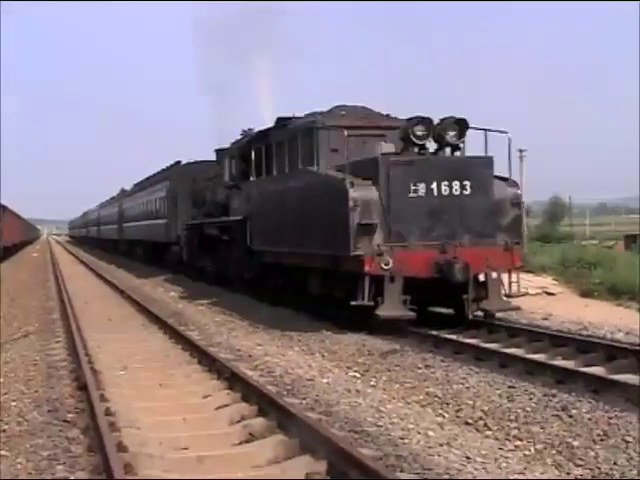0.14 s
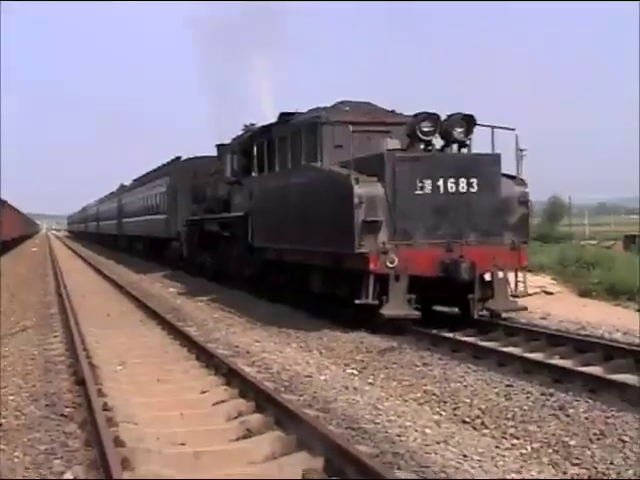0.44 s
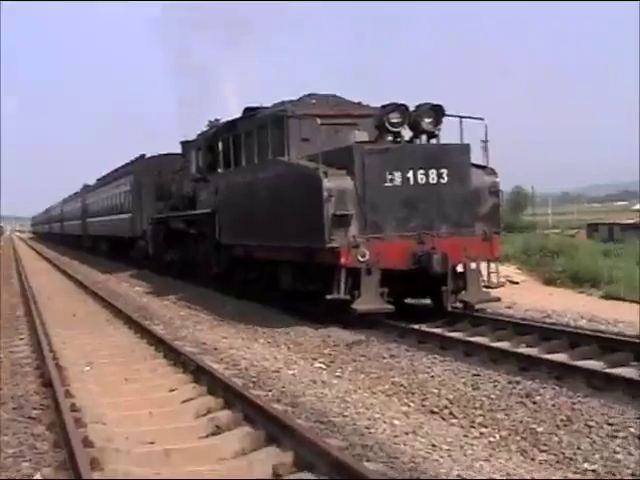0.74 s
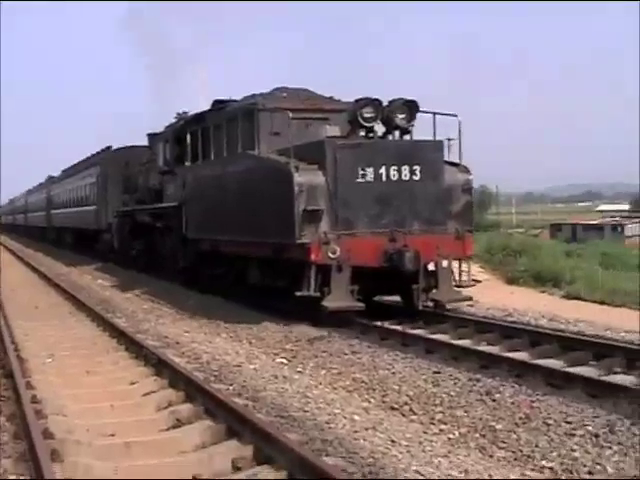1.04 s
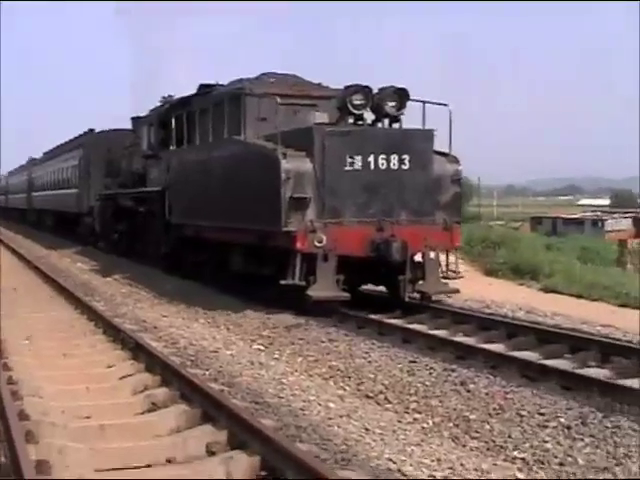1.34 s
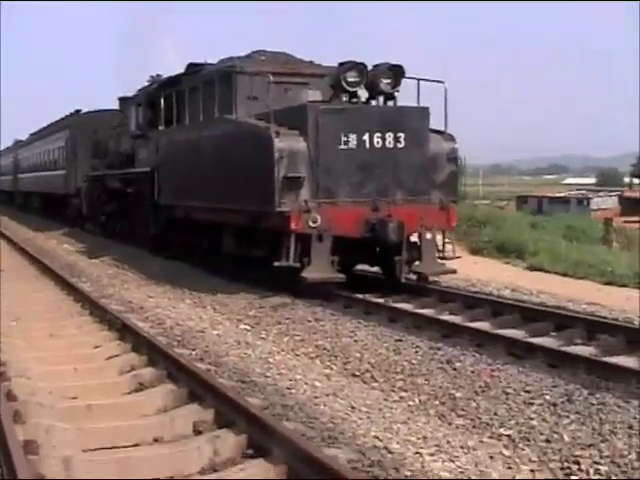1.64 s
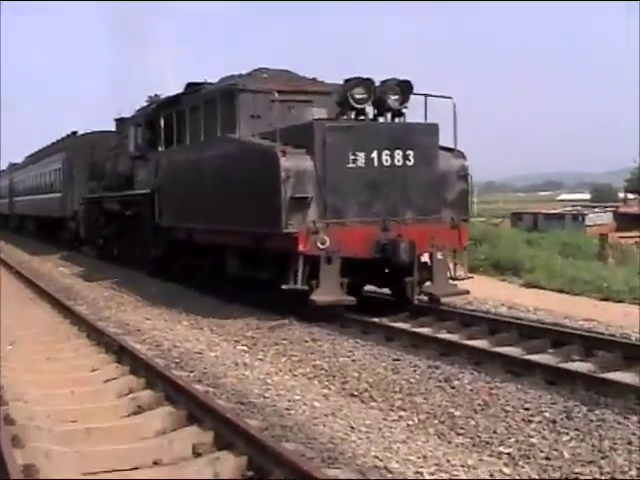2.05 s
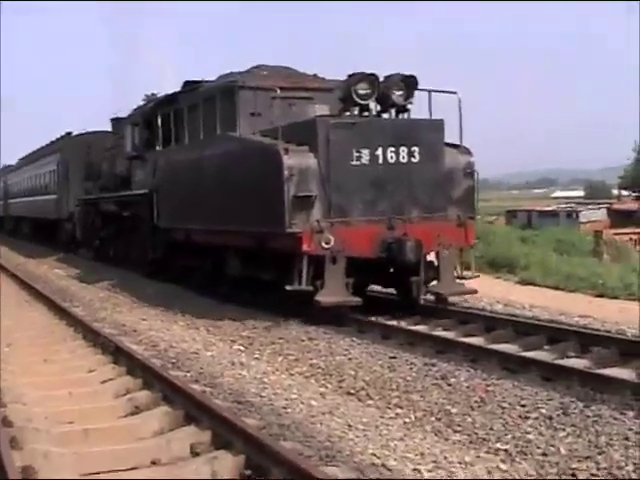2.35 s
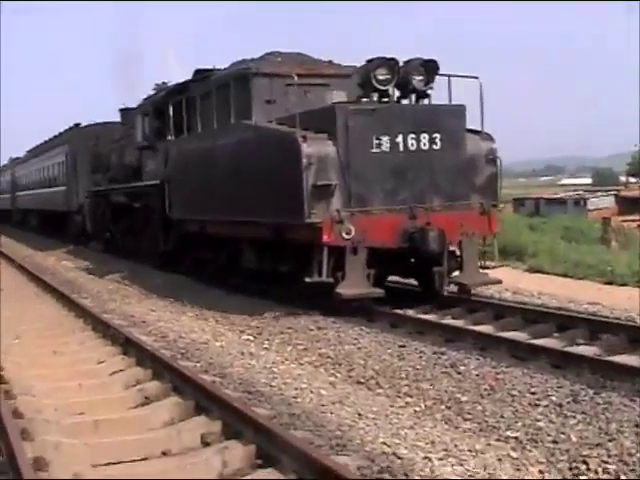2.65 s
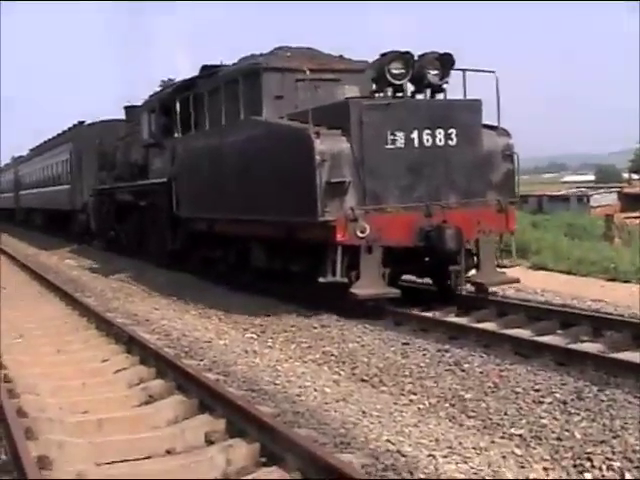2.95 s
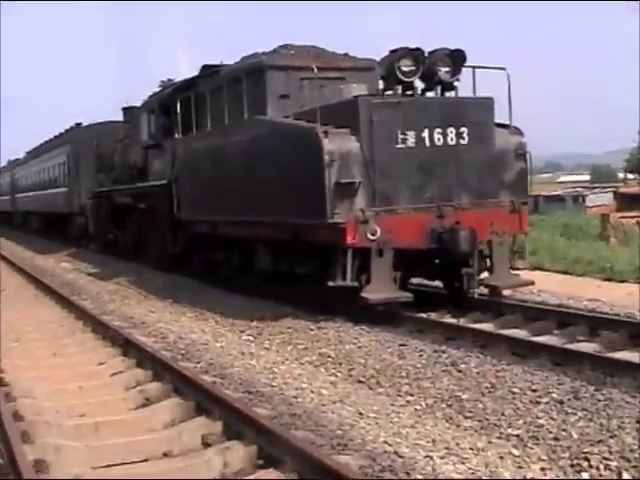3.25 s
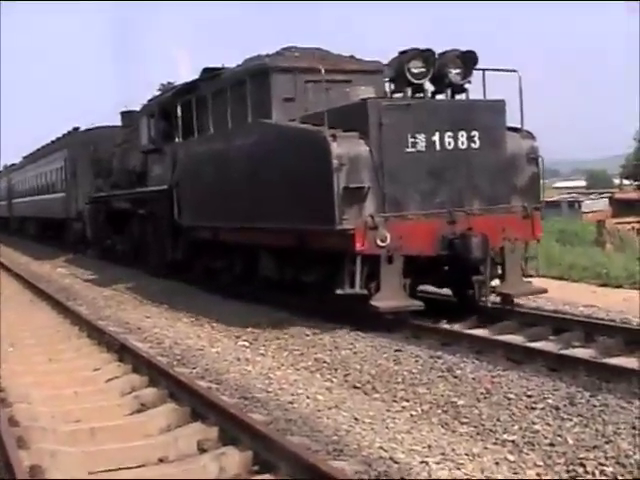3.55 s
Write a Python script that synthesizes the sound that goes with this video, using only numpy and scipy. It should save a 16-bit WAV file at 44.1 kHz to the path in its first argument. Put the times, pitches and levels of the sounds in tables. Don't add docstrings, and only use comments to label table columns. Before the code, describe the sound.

A steam locomotive chuffs slowly four times, each a hollow, barking blast of steam, over continuous sharp hissing and a soft low roar, with faint metal clanks between; open trackside, heard close on a small camera microphone.

```python
import sys
import numpy as np
from scipy import signal
from scipy.fft import rfft, irfft, next_fast_len
from scipy.io import wavfile
from scipy.ndimage import uniform_filter1d

SR = 44100
rng = np.random.default_rng(int(sys.argv[2]) if len(sys.argv) > 2 else 0)


def wrap_up_sound(samples):
    columns = np.atleast_2d(samples).T
    tamed = np.clip(columns, -1, 1)
    steps = np.round(tamed * 32767).astype(np.int16)
    wavfile.write(sys.argv[1], SR, steps)


def gain_from_db(level_db):
    decades = np.asarray(level_db, float) / 20
    return 10 ** decades


N = 163170

# pitch_hz, level_db_per_hz
ROAR_SPECTRUM = [(20, -19), (60, -9.5), (110, -3), (280, -3), (500, -5.5), (1000, -1), (2200, -6),
                 (3400, -25)]
ROAR_DB, ROAR_FOLLOWS_LEAK, NEARING_DB_PER_S = -35, 0.077, 1
# time_s, level_db
LEAK_PRESSURE = [(0, -26), (.45, -24.5), (.8, -25), (1.2, -24.5), (1.8, -24), (1.92, -21), (2.1, -24.5),
                 (2.2, -22), (2.35, -22), (2.75, -24), (3.2, -24.5), (3.7, -25.5)]
# pitch_hz, level_db_per_hz
HISS_SPECTRUM = [(880, -14), (1500, -22), (1760, -9), (2160, -8), (2620, -8), (3940, -3), (4460, -9),
                 (7590, -4.5), (9500, -15), (12400, -76)]
# pitch_hz, level_db_per_hz
FIZZ_SPECTRUM = [(7500, -23), (8600, 2), (9600, 2.5), (11200, 5.5), (11700, 4.5), (13200, -8), (14000, -7),
                 (15000, -32)]
FIZZ_DB, FIZZ_PATCH_DB, FIZZ_FLICKER_DB = -11, 0.7, 0.9
# pitch_hz, level_db_per_hz
SING_SPECTRUM = [(3600, -11), (3920, 7), (4200, -40)]
# time_s, level_db
SING_LEVEL = [
    (0, -20),
    (2.7, -11.5),
    (3.0, -15),
]
# time_s, pitch_hz, level_db
WHINE = [(0, 288.7, -44), (1.1, 286.7, -47), (2.6, 288, -45), (3.7, 291, -85)]

# start_s, peak_db, pitch_hz, fall_by_60_db_s
CLANKS = [
    (.195, -28.5, 2110, 0.29),
    (.685, -35, 1026, 0.078),
    (1.17, -23, 1150, 0.081),
    (2.06, -25, 2000, 0.1),
    (3.03, -31, 5900, 0.11),
    (3.2, -23.5, 1258, 0.19),
]
# start_s, length_s, level_db, pitch_hz
SWELLS = [
    (.825, .09, -25, 360),
    (.83, .07, -29, 1378),
    (.88, .12, -24, 935),
    (2.78, .07, -35, 30),
    (3.575, .08, -35, 30),
]

# start_s, level_db, fall_by_60_db_s, pitch_hz, width_hz
LAST_BEAT = (.0, -29, .4, 187, 20)
# start_s, length_s, level_db, pitch_hz
FLARES = [(.875, .045, -16, 265), (.91, .045, -19, 127), (.9, .055, -16, 940), (.955, .045, -18, 900),
          (.87, .035, -21, 850), (.915, .03, -20, 1030), (.85, .055, -23, 1372), (1.865, .055, -13, 290),
          (1.875, .05, -14, 790), (1.905, .05, -19, 1290), (1.93, .04, -19, 135), (1.955, .035, -16, 260),
          (1.945, .04, -22, 1030), (1.9, .045, -23, 1900), (2.16, .035, -28, 760), (2.775, .08, -14, 770),
          (2.785, .045, -15, 1000), (2.775, .05, -14, 355), (2.785, .07, -15, 260), (2.855, .03, -14, 300),
          (2.885, .06, -17, 290), (3.565, .045, -12, 781), (3.555, .03, -14, 270), (3.585, .045, -9, 258),
          (3.575, .035, -16, 1020), (3.625, .03, -14, 1000), (3.55, .025, -21, 1250),
          (3.58, .035, -17, 520), (2.79, .035, -18, 540), (1.875, .035, -21, 520), (2.815, .04, -10, 290),
          (2.82, .035, -14, 765), (.91, .04, -18, 345), (.975, .06, -22, 350), (1.01, .035, -23, 130),
          (2.13, .07, -31, 220), (3.63, .04, -15, 280), (2.9, .04, -19, 780), (2.18, .05, -29, 1150),
          (3.23, .035, -25, 1230)]
FLARE_WOBBLE, WOBBLES_PER_S = 0.014, 60

# time_s, level_db, brightness_db
BLASTS = [
    [(.81, -45, -3), (.83, -30, 0), (.856, -18, -2.5), (.895, -12, -3), (.95, -14, 0), (.995, -19, 2),
     (1.05, -24.5, 1.5), (1.11, -31, 2.5), (1.3, -39.5, 0.5)],
    [(1.81, -48, -4), (1.845, -25, -2), (1.9, -8.5, -1), (1.97, -17.5, 1), (2.04, -25, -4),
     (2.15, -36, 5.5), (2.175, -27, 5), (2.215, -31.5, 6.5), (2.3, -40, 4)],
    [(2.742, -30, 6.5), (2.756, -17.5, 6), (2.776, -10.5, -1.5), (2.803, -7, 0), (2.86, -12.5, -1),
     (2.9, -13, 4), (2.95, -17, 4), (3.04, -23, 4.5), (3.25, -34.5, 10)],
    [(3.51, -51, -5), (3.55, -25.5, -1), (3.572, -9.5, -1.5), (3.595, -14, 4), (3.622, -12, -4),
     (3.64, -12.5, -1), (3.67, -19.5, 1.5), (3.7, -19, 0)],
]
# boom_db, chest_db, bark_db, spray_db, pitch_factor
BEAT_COLOURS = [
    (-12.5, 0, 0, -6, 1.01),
    (-9, 0.5, 0.5, -7.5, 1.001),
    (-16, 0.5, -5, -8.5, .999),
    (-6, 2.5, 1.5, -6.5, 1.002),
]
# pitch_hz, width_hz, level_db
BOOM_MODES = [(124, 13, 6.5), (164, 31, -3.5)]
# pitch_hz, width_hz, level_db
CHEST_MODES = [(249.7, 14.6, -5.5), (286, 25, -9), (352.2, 27.4, -1.5), (499.4, 24, -5.5)]
# pitch_hz, width_hz, level_db
BARK_MODES = [(707, 38, -4), (782, 21.5, -2), (938, 72, -3.5), (1006, 17, -7.5), (1138, 53, 0.5),
              (1274, 39, -1), (1392, 38, -4)]
# pitch_hz, level_db_per_hz
JET_SPECTRUM = [(25, -43), (60, -18), (120, -6.5), (300, -6), (800, -3.5), (1300, -6.5), (3000, -24.5),
                (9500, -35)]
# pitch_hz, level_db_per_hz
SPRAY_SPECTRUM = [(1200, -21), (1800, 10), (2600, 6), (3900, 1), (4600, -8.5), (7500, -3.5), (10000, -12.5),
                  (14000, -29)]
BOOM_LAG_S, JET_DB, STEADY_S = 0.023, -6, 0.03
EDDY_DB, EDDIES_PER_S = 0.8, 40
TAIL_EDDY_DB, TAIL_DROP_DB = 0.5, 12

# pitch_hz, width_hz, level_db
HOUSING_COLOUR = [(217, 18, -1), (550, 88, -2.5), (704, 49, 2), (1040, 48, 4.5), (1190, 29, -1.5),
                  (1382, 55, 4.5), (1460, 76, -5), (1733, 60, 1.5), (1960, 50, -4.5), (2570, 81, -1.5),
                  (3140, 110, -2), (4380, 220, -1.5)]
# pitch_hz, lead_radians
LEAD = [(100, -.3), (1550, -.4), (1900, -.1), (2400, -.2), (3400, 0), (4650, .3), (5500, .15), (6550, .03),
        (7060, .4), (7600, .5), (8600, 1.5), (9650, 2.8), (10200, 3.05), (12200, 3.2), (13000, 4.6),
            (13800, 6.1)]
# pitch_hz, likeness_0_to_1
LIKENESS = [(40, .9), (150, .99), (1000, .98), (1550, .92), (1900, .98), (3500, .975), (4700, .85),
            (6550, .98),
            (7100, .92), (8100, .78), (9100, .65), (9700, .8), (10300, .93), (11700, .95), (12800, .35),
                (14000, .6)]
# pitch_hz, difference_db
TILT = [(100, -.4), (1500, 1), (4600, 1.5), (6500, 0), (8100, -5.5), (10200, 0), (13200, 3), (14400, 0)]
FIELD_SHARES = np.array([[1.], [.3]])

# start_s, drop_db
GAIN_DROPS = [
    (2.822, 3.5),
    (3.61, 3),
]
RECOVER_DB_PER_S, CEILING = 6.5, 1.3


def read(points, hz):
    f, value = np.transpose(points)
    return np.interp(np.log(hz + 1), np.log(f + 1), value)


def evened(x):
    return x / np.sqrt(np.mean(x ** 2) + 1e-20)


def steadied(x):
    power = uniform_filter1d(x[:1] ** 2, size=round(STEADY_S * SR), axis=1)
    return x / np.sqrt(abs(power) + 0.021)


def add(mix, s, sound):
    part = mix[:, round(s * SR):][:, :sound.shape[1]]
    part += sound[:, :part.shape[1]]


def drift(count, per_s):
    lowpass = signal.butter(2, np.clip(per_s, .1, 900), fs=SR, output="sos")
    return evened(signal.sosfilt(lowpass, rng.standard_normal(count + SR))[SR:])


def within(spectrum, hz):
    return (hz >= spectrum[0][0]) & (hz <= spectrum[-1][0])


def noise(spectrum, count, patchy_db=0., flicker_db=0.):
    frames, hz = count // 128 + 9, np.fft.rfftfreq(512, 1 / SR)
    a, b, c, d, patches, wide = rng.standard_normal((frames, 257, 6)).T
    patches = uniform_filter1d(uniform_filter1d(patches, size=6, axis=0), size=24, axis=1)
    wide = uniform_filter1d(uniform_filter1d(wide, size=70, axis=0), size=12, axis=1)
    level_db = read(spectrum, hz)[:, None] + patchy_db * evened(patches) + flicker_db * evened(wide)
    z = np.array([a + 1j * b, c + 1j * d]) * gain_from_db(level_db) * within(spectrum, hz)[:, None]
    return evened(signal.istft(z, nperseg=512, noverlap=384)[1][:, :count])


def low_noise(spectrum, count):
    hz = np.fft.rfftfreq(count, 1 / SR)
    white = rfft(rng.standard_normal((2, count)))
    return evened(irfft(white * gain_from_db(read(spectrum, hz)) * within(spectrum, hz), count))


def pipe(x, modes, factor=0.95):
    out = np.zeros(x.shape)
    for k, (hz, width, db) in enumerate(modes):
        b, a = signal.iirpeak(hz * factor, hz / (1.74 * width), SR)
        ring = signal.lfilter(b, a, signal.lfilter(b, a, x))
        out += (-1) ** k * gain_from_db(db) * evened(ring)
    return evened(out)


def boiler_roar(t, leak_db):
    level_db = ROAR_DB + NEARING_DB_PER_S * (t - 1.5)
    level_db = level_db + ROAR_FOLLOWS_LEAK * (leak_db - leak_db.mean()) + 0.17 * drift(N, 5.3)
    return gain_from_db(level_db) * low_noise(ROAR_SPECTRUM, N)


def whine(t):
    s, hz, db = np.transpose(WHINE)
    turns = np.cumsum(np.interp(t, s, hz) * (1 + 0.01 * drift(N, 7.3))) / SR
    return gain_from_db(np.interp(t, s, db) + 4.0 * drift(N, 9.7)) * np.sin(2 * np.pi * turns)


def leaking_steam(t, leak_db):
    hiss = noise(HISS_SPECTRUM, N, patchy_db=0.52, flicker_db=1.1)
    fizz = noise(FIZZ_SPECTRUM, N, patchy_db=FIZZ_PATCH_DB, flicker_db=FIZZ_FLICKER_DB)
    sing = gain_from_db(np.interp(t, *np.transpose(SING_LEVEL))) * noise(SING_SPECTRUM, N)
    return gain_from_db(leak_db) * (hiss + gain_from_db(FIZZ_DB) * fizz + sing)


def clank(s, db, hz, t60):
    t = np.arange(0, .4, 1 / SR)
    ring = np.sin(2 * np.pi * hz * t) + .4 * np.sin(2 * np.pi * 1.017 * hz * t)
    return s, np.minimum(t / 0.0052, 1) * gain_from_db(db - 60 * t / t60) * ring * FIELD_SHARES


def swell(s, length, db, hz):
    t = np.arange(0, length, 1 / SR)
    return s, gain_from_db(db) * np.sin(np.pi * t / length) * np.sin(2 * np.pi * hz * t) * FIELD_SHARES


def last_beat():
    s, db, t60, hz, width = LAST_BEAT
    t = np.arange(SR) / SR
    modes = [(hz, width, 0), (1.6 * hz, width, -6), (950, 300, -9)]
    ring = pipe(rng.standard_normal((2, 2 * SR)), modes)
    return s, gain_from_db(db - 60 * t / t60) * steadied(ring)[:, SR:]


def flare(s, length, db, hz):
    t = np.arange(0, .1, 1 / SR)
    turns = np.cumsum(hz * (1 + FLARE_WOBBLE * drift(len(t), WOBBLES_PER_S))) / SR
    shape = np.sin(np.pi * np.minimum(t / length, 1))
    return s, gain_from_db(db) * shape * np.sin(2 * np.pi * turns) * FIELD_SHARES


def chuff(curve, colour):
    s, level_db, bright_db = np.transpose(curve)
    boom_db, chest_db, bark_db, spray_db, factor = colour
    t = np.arange(s[0], s[-1] + 0.08, 1 / SR)
    count, lead = len(t), SR // 10
    fade = np.clip(1 - (t - s[-1]) / 0.14, 0, 1) * np.clip((t - s[0]) / 0.015, 0, 1)
    press_db = np.interp(t, s, level_db)
    bright = gain_from_db(np.interp(t, s, bright_db))

    white = rng.standard_normal((2, count + lead))
    chest = steadied(pipe(white, CHEST_MODES, factor))[:, lead:]
    bark = steadied(pipe(white, BARK_MODES, factor))[:, lead:]
    boom = steadied(pipe(white, BOOM_MODES, factor))[:, lead:]

    after_peak = t > s[level_db.argmax()]
    spent = np.clip((level_db.max() - press_db) / TAIL_DROP_DB, 0, 1) * after_peak
    eddy = evened(gain_from_db((EDDY_DB + TAIL_EDDY_DB * spent) * drift(count, EDDIES_PER_S)))
    body = gain_from_db(chest_db - 7.5) * chest / bright + gain_from_db(bark_db - 7.5) * bright * bark
    jet = gain_from_db(JET_DB) * low_noise(JET_SPECTRUM, count)
    spray = gain_from_db(spray_db) * bright * noise(SPRAY_SPECTRUM, count, patchy_db=2.5)
    lagging_db = boom_db + 1.105 * np.interp(t - BOOM_LAG_S, s, level_db)
    return s[0], gain_from_db(press_db) * fade * eddy * (body + jet + spray) + gain_from_db(lagging_db) * fade * boom


def two_ports(field):
    size = next_fast_len(N + 4096)
    hz = np.fft.rfftfreq(size, 1 / SR)
    housing_db = sum(db * np.exp(-(2 * (hz - f) / width) ** 2 / 2) for f, width, db in HOUSING_COLOUR)
    direct, diffuse = rfft(field, size) * gain_from_db(housing_db)
    same = np.clip(read(LIKENESS, hz), 0, 1)
    turn = gain_from_db(read(TILT, hz) / 2) * np.exp(.5j * read(LEAD, hz))
    shared = np.sqrt((1 + same) / 2) * direct
    opposed = np.sqrt((1 - same) / 2) * diffuse
    return irfft(np.array([(shared + opposed) * turn, (shared - opposed) / turn]), size)[:, :N]


def scene():
    t = np.arange(N) / SR
    leak_db = np.interp(t, *np.transpose(LEAK_PRESSURE))
    field = boiler_roar(t, leak_db) + whine(t) + leaking_steam(t, leak_db)
    for row in CLANKS:
        add(field, *clank(*row))
    for row in SWELLS:
        add(field, *swell(*row))
    add(field, *last_beat())
    for row in FLARES:
        add(field, *flare(*row))
    for curve, colour in zip(BLASTS, BEAT_COLOURS):
        add(field, *chuff(curve, colour))
    return two_ports(field)


def band_limit(x):
    return signal.sosfilt(signal.butter(12, 15020, fs=SR, output="sos"), x)


def record(dry):
    t = np.arange(N) / SR
    down_db = np.zeros(N)
    for s, db in GAIN_DROPS:
        onset = np.clip((t - s) / 0.0061, 0, 1)
        down_db += onset * np.maximum(db - RECOVER_DB_PER_S * (t - s), 0)
    mix = CEILING * np.tanh(dry / gain_from_db(down_db) / CEILING)
    return band_limit(mix)


dry = scene()
out = record(dry)
wrap_up_sound(out)
```